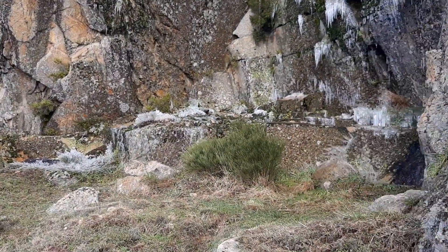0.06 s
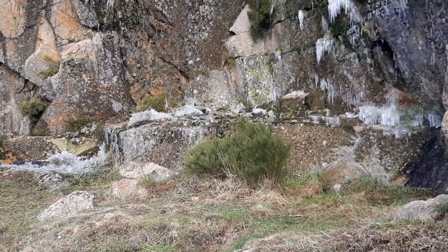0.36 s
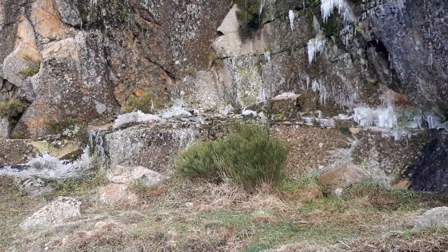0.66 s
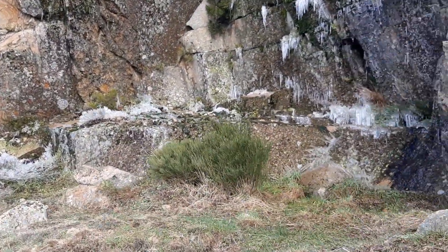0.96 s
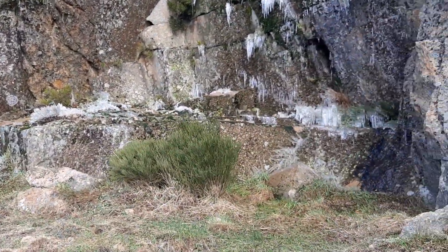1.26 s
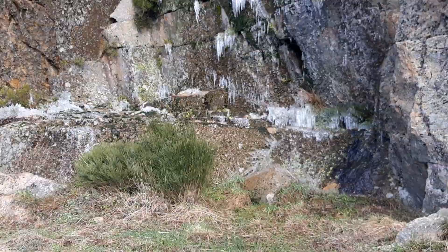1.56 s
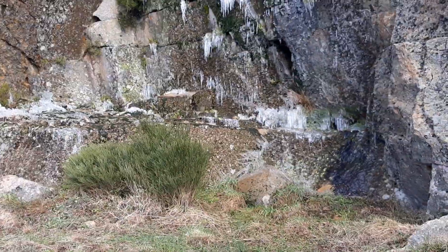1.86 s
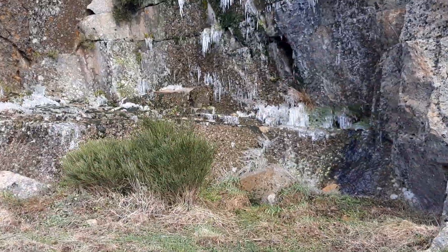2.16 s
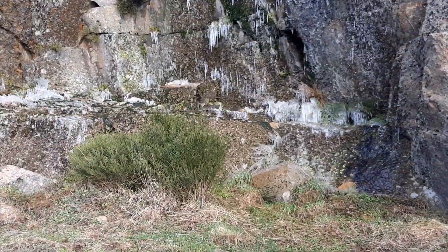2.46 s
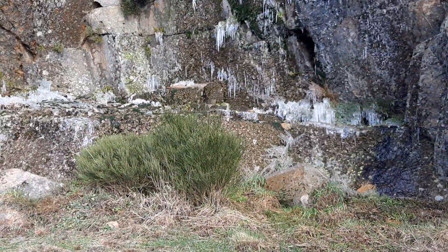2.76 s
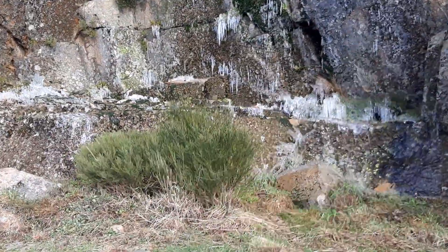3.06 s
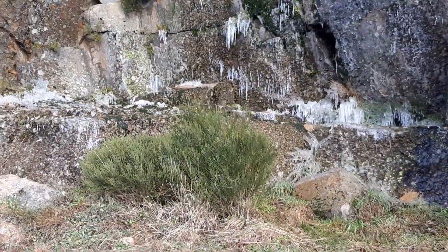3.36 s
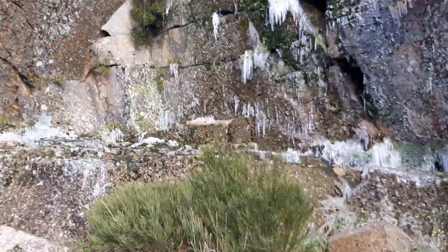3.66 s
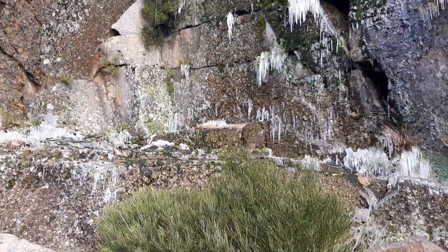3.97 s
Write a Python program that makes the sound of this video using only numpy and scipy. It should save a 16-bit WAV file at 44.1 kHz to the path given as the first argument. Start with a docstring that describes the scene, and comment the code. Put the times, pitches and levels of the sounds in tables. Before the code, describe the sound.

Soft wind gusts rumble on the microphone, with small water drips and dry grass crackling underfoot.

```python
"""Slow steps over dry grass below a thawing, icy cliff, with distant air hissing throughout.
At first gusts buffet the two microphone ports while meltwater spatters on the rock and stalks snap.
From about 0.7 s the grass crackles under the tread and a sole scuffs the turf; it rocks a loose stone
at 1.3 s and 2.3 s, as the wind eases. The sharpest scuff comes at 3.5 s, then the gusts return and
the patter of far drips swells at the very end."""
import sys
import numpy as np
from scipy import signal
from scipy.fft import rfft, irfft
from scipy.io import wavfile
from scipy.ndimage import uniform_filter1d

SR = 44100
rng = np.random.default_rng(int(sys.argv[2]) if len(sys.argv) > 2 else 0)


def unload_wav(signal):
    """Save mono or channel-first audio to the path in sys.argv[1] as 16-bit WAV at rate SR, clipped to [-1, 1]."""
    wavfile.write(
        sys.argv[1],
        SR,
        np.round(np.clip(np.atleast_2d(signal).T, -1, 1) * 32767).astype(np.int16),
    )


N = 176400
TIME = np.arange(N) / SR


# weight of the tread on the grass: (time [s], relative level [dB])
TREAD_CURVE = [(0.0, -72), (0.68, -64), (0.87, -70), (1.18, -55), (1.3, -66.5), (1.65, -76), (2.06, -58),
               (2.25, -70.5), (2.4, -58.5), (2.7, -82), (2.88, -65), (3.3, -61.5), (3.44, -67),
               (3.56, -54.5), (4.0, -65)]
# tone of the dry blades: (frequency [Hz], relative level [dB])
GRASS_EQ = [(300, -37), (800, -7), (1600, -1), (2800, -2), (4400, 1), (7000, -8), (15000, -6.5)]

def grass():
    """Crushed blades give a dense crackle that rides the weight of the tread."""
    tread_db = automation(TREAD_CURVE)
    clicks = grains(per_s=600, spread_db=3)
    crackle = np.sqrt(signal.lfilter([1], [1, -.93], clicks ** 2 + 1e-18)) * white()
    return coloured(crackle, GRASS_EQ) * from_db(-63.5 + 1.14 * tread_db)


# breaking stalks: (time [s], level [dB], pitch [Hz], decay [s], ping against the crack [dB])
STALK_SNAPS = [(0.3279, -33, 5240, 0.0007, -3.5), (0.52, -39, 4800, 0.0013, -7),
               (0.535, -37.5, 4930, 0.0018, -12), (.653, -44.5, 4080, 0.016, -4),
               (1.137, -38, 5070, 0.003, -10), (1.149, -41, 5640, 0.002, -6),
               (1.2638, -49.5, 4740, 0.0014, 9.5), (1.69, -50, 5500, .004, -6),
               (2.0299, -30, 3960, 0.00075, -10), (2.032, -39, 4800, 0.0018, -10),
               (2.105, -43.5, 3550, 0.004, -16), (2.441, -39, 6150, 0.0059, -14),
               (2.907, -44.5, 4900, 0.0087, -14), (2.957, -45.5, 4700, 0.0045, -1),
               (3.253, -39.5, 3530, .005, -6), (3.275, -44, 4860, 0.016, -12),
               (3.507, -32, 2800, 0.0052, -10), (3.603, -38, 4600, 0.0076, -15)]

def snaps():
    """A dry stalk breaks with a splintery crack and a brief clean ping at its own pitch."""
    out, fibres = 0, white()
    for s, db, hz, decay, ping_db in STALK_SNAPS:
        splinter = evened(resonance(fibres, hz, q=2), samples=130)
        crack = burst(s, decay) * (splinter + from_db(-28) * fibres)
        ping = from_db(ping_db) * burst(s, decay=.0015) * sine(hz, s)
        out = out + from_db(db) * (crack + ping)
    return cut(out, 1800, "high") * panned(-3.5)


# sole on turf: (time [s], level [dB], attack [s], decay [s], low-pass [Hz], resonance [Hz])
SOLE_SCUFFS = [(0.863, -52, 0.0046, 0.021, 1440, 1290), (1.19, -50, 0.016, 0.041, 1900, 1660),
               (1.811, -51.5, 0.019, 0.022, 1330, 490), (2.03, -56, 0.19, 0.16, 2140, 1430),
               (2.312, -50.5, 0.0066, 0.054, 2080, 1520), (2.892, -56.5, 0.048, 0.077, 1390, 1080),
               (3.26, -55, 0.11, 0.077, 2110, 1580), (3.506, -37.5, 0.015, 0.015, 7140, 2670),
               (3.53, -51, 0.057, 0.13, 2060, 1450)]
# tone of the grit: (frequency [Hz], relative level [dB])
GRIT_EQ = [(150, 10.5), (450, 7), (900, 3), (1800, 3), (4000, 8), (12000, 15.5)]
# stereo image of the grit: (frequency [Hz], left-right correlation [-1..1])
GRIT_IMAGE = [(600, 1), (3000, 0.088)]

def scuffs():
    """The sole rubs the turf: mostly dull, gritty friction, each scuff with its own resonance."""
    out, grit = 0, wide_noise(GRIT_EQ, GRIT_IMAGE) * from_db(2 * wander(hz=157))
    for s, db, attack, decay, top_hz, ring_hz in SOLE_SCUFFS:
        rub = grit + 1.4 * resonance(grit, ring_hz, q=7.9)
        out = out + from_db(db) * burst(s, decay, attack) * rms_one(cut(rub, top_hz, order=3))
    return out


# a loose stone rocks under the sole: (time [s], level [dB], low-pass [Hz])
STONE_KNOCKS = [(1.319, -35, 600), (2.3028, -36.5, 1400), (2.314, -38.5, 3000)]
# modes of the stone: (frequency [Hz], relative level [dB])
STONE_MODES = [(280, -4.5), (520, -5.5), (1350, -11.5), (1850, -6), (2200, -5)]

def knocks():
    """A stone bedded in turf rings for a few milliseconds; the first knock is dull, the rest brighter."""
    out = 0
    for s, db, top_hz in STONE_KNOCKS:
        ring = sum(from_db(mode_db) * sine(hz, s) for hz, mode_db in STONE_MODES)
        out = out + from_db(db) * cut(ring * burst(s, decay=.0033), top_hz)
    return out


# close drops on rock: (time [s], relative tick level [dB], relative spray level [dB])
NEAR_DRIPS = [(.132, -35, -45), (0.164, -50, -39.5), (0.519, -27, -35.5), (0.5998, -31, -44),
              (.618, -27.5, -44), (0.655, -28, -40), (1.0483, -19.5, -54), (1.1504, -28, -44),
              (1.323, -33, -62), (1.4318, -28, -54), (1.8302, -31, -58), (1.8551, -23, -40),
              (1.8694, -32, -43), (2.0299, -33, -51), (2.202, -36, -41), (2.7594, -37, -43),
              (3.103, -33, -33), (3.13, -41, -51), (3.161, -43, -34.5), (3.3585, -30, -35.5),
              (3.4897, -26, -38), (3.563, -20, -39), (3.867, -26.5, -52)]
# tone of splashing water: (frequency [Hz], relative level [dB])
SPLASH_EQ = [(1500, 12), (3000, -5), (5000, 3.5), (8000, 7), (12000, 6), (16000, 1.5)]

def drips():
    """Close drops hit the rock with a bright, ringing tick and a grainy spray, over the far patter."""
    near_gain = from_db(-7.5)
    impacts = near_gain * sum(from_db(db) * burst(s, decay=.00036) for s, db, _ in NEAR_DRIPS)
    sprays = near_gain * sum(from_db(db) * burst(s, decay=.013) for s, _, db in NEAR_DRIPS)
    tick = impacts * evened(coloured(white(), SPLASH_EQ), samples=24)
    ring = from_db(-5) * resonance(tick, 12000, q=5.1)
    wash_envelope = np.hypot(sprays, far_patter())
    wash = coloured(white(), SPLASH_EQ) * wash_envelope
    graininess = rms_one(from_db(3.5 * wander(hz=390)))
    return tick + ring + wash * graininess


# fader ride on the far drips and droplets: (time [s], relative level [dB])
PATTER_CURVE = [(0.0, -60), (0.61, -57.5), (1.2, -59.5), (1.4, -60), (2.95, -56), (3.62, -52.5),
                (3.91, -56.5), (4.0, -41.5)]

def far_patter():
    """Envelope of many farther drops landing at random, each with a short tail of spray."""
    decay_s = .017
    hits = grains(per_s=82, spread_db=3)
    power = signal.lfilter([1], [1, -np.exp(-2 / (decay_s * SR))], hits ** 2 + 1e-18)
    envelope = np.sqrt(np.abs(uniform_filter1d(power, SR // 800)))
    return rms_one(envelope) * from_db(-56.5 + automation(PATTER_CURVE))


def droplets():
    """Scattered water lands in tiny sharp ticks that rise and fall with the patter."""
    hits = signal.lfilter([1], [1, -.98], grains(per_s=120, spread_db=1) + 1e-18)
    return coloured(hits * white(), SPLASH_EQ) * from_db(-61.5 + automation(PATTER_CURVE))


# gusts and eddies: (time [s], level [dB], half length [s], low-pass [Hz], left over right [dB])
GUSTS = [(0.031, -27, 0.041, 206, 3), (0.131, -30.5, 0.048, 255, -12), (0.284, -30.5, 0.082, 185, 3.5),
         (0.439, -25, 0.024, 212, -10), (0.513, -14, 0.01, 204, 23), (0.547, -28, 0.038, 190, 0.5),
         (0.576, -20, 0.0067, 185, -24), (0.799, -30.5, 0.12, 142, 0), (1.05, -27, 0.021, 276, -12),
         (1.157, -31.5, 0.043, 169, 3.5), (1.367, -46, 0.028, 125, -1), (1.485, -39.5, 0.018, 134, -7),
         (1.716, -48, 0.021, 105, 22), (1.924, -34.5, 0.03, 246, -33), (2.063, -36, 0.055, 143, -2.5),
         (2.184, -30.5, 0.027, 230, -37), (2.353, -41.5, 0.023, 109.3, -21), (2.626, -44, 0.024, 100, 2),
         (2.867, -42, 0.028, 230, 1), (3.0, -42, 0.037, 105, -12), (3.221, -25.5, 0.006, 195, 34),
         (3.25, -37.5, 0.077, 132, -6), (3.55, -35, 0.038, 146, -3), (3.708, -29.5, 0.054, 228, -9),
         (3.78, -32, 0.17, 158, -8.5)]
# tone of the buffeting: (frequency [Hz], relative level [dB])
RUMBLE_EQ = [(22, -64), (37, -6), (55, 4), (84, 3.5), (120, 0.5), (200, -3), (400, -12), (1000, -12.5)]
# tone of the wind's hiss: (frequency [Hz], relative level [dB])
HISS_EQ = [(300, 2), (600, 6), (1200, -1), (2700, -24), (8000, -13)]

def wind():
    """Gusts rumble separately at the two ports over a low breeze; a faint hiss swells with the flow."""
    swirl = evened(coloured(white(), RUMBLE_EQ), samples=1800)
    swirl = rms_one(swirl * from_db(2.5 * wander(hz=52)))
    breeze_gain = from_db(-54)
    rumble = breeze_gain * rms_one(cut(swirl, 117, order=3))
    flow = breeze_gain ** 2
    for s, db, half_length, top_hz, pan_db in GUSTS:
        swell = from_db(db) / (1 + .25 * ((TIME - s) / half_length) ** 2) ** 3
        push = rms_one(cut(swirl, top_hz, order=3))
        skew = .12 * cut(push ** 2, 144, "high")  # pressure at a port swings harder one way
        rumble = rumble + swell * panned(pan_db) * (push + slap(s, half_length, top_hz) - skew)
        flow = flow + swell ** 2
    hiss = rms_one(coloured(white(), HISS_EQ) * uniform_filter1d(flow, SR // 4) ** .25)
    return from_db(-.5) * rumble + from_db(-61) * hiss


def slap(s, half_length, top_hz):
    """An eddy slaps the port with one swing of pressure, hardest for the briefest eddies."""
    width_s = .2 / top_hz
    strength = from_db(-3.5) * np.exp(-half_length / .037)
    u = np.minimum(((TIME - s) / width_s) ** 2, 50)
    return strength * (u - 1) * np.exp(-u / 2)


def cliff(x):
    """The rock face scatters close sounds back as a very short reverb."""
    t, decay_s = TIME[:SR // 3], .012
    scatter = rng.standard_normal((2, len(t))) * np.exp(-t / decay_s)
    return signal.fftconvolve(x, rms_one(scatter) / np.sqrt(len(t)), axes=1)[:, :N]


# tone of the distant air: (frequency [Hz], relative level [dB])
AIR_EQ = [(100, 13.5), (300, 7), (1100, 4.5), (1550, 3.5), (2100, -2), (2900, -16), (8000, -15.5),
          (15000, -22)]
# stereo image of the air: (frequency [Hz], left-right correlation [-1..1])
AIR_IMAGE = [(100, 0.44), (400, 0.92), (950, -0.62), (2000, 0.09)]

def distant_air():
    """Far-off air lays a soft, steady bed of hiss behind everything."""
    return from_db(-56.5) * cut(wide_noise(AIR_EQ, AIR_IMAGE), 78, "high")


def from_db(db):
    """Decibels to gain."""
    return 10 ** (np.asarray(db) / 20)


def rms_one(x):
    """Scale to unit rms."""
    return x / np.sqrt(np.mean(x ** 2) + 1e-20)


def evened(x, samples):
    """Level a sound by its running rms."""
    return x / np.sqrt(np.abs(uniform_filter1d(x ** 2, samples)) + 1e-12)


def automation(curve):
    """A level curve at every sample, in dB about its mean."""
    db = np.interp(TIME, *np.transpose(curve))
    return db - db.mean()


def at_hz(points):
    """A table over log frequency, read at every FFT bin."""
    hz, value = np.transpose(points)
    return np.interp(np.log(np.fft.rfftfreq(N, 1 / SR) + 1), np.log(hz), value)


def panned(db):
    """Constant-power pan; positive is left."""
    gains = from_db(np.array([[.5], [-.5]]) * db)
    return gains / np.sqrt(np.mean(gains ** 2, axis=0))


def cut(x, hz, kind="low", order=2):
    """Butterworth low- or high-pass."""
    return signal.sosfilt(signal.butter(order, hz, kind, fs=SR, output="sos"), x)


def resonance(x, hz, q):
    """Resonant band-pass."""
    return signal.lfilter(*signal.iirpeak(hz, q, fs=SR), x)


def sine(hz, s):
    """A pure tone with a random phase at time s."""
    return np.sin(2 * np.pi * (hz * (TIME - s) + rng.random()))


def white():
    """Independent noise in each channel."""
    return rng.standard_normal((2, N))


def wander(hz):
    """Random modulation, low-passed at hz; rms 1."""
    return rms_one(cut(rng.standard_normal(N), hz))


def coloured(x, eq):
    """Apply an EQ curve; rms 1."""
    return rms_one(irfft(rfft(x) * from_db(at_hz(eq)), N))


def wide_noise(eq, image):
    """Coloured noise whose stereo width varies with frequency."""
    mid, side = rfft(white())
    alike = np.clip(at_hz(image), -1, 1)
    spectrum = np.sqrt(1 + alike) * mid + np.sqrt(1 - alike) * side * [[1], [-1]]
    return coloured(irfft(spectrum, N), eq)


def burst(s, decay, attack=.0001):
    """Envelope with a rounded rise to its peak at s and an exponential fall; times in seconds."""
    t = TIME - s
    return np.exp(-np.minimum(np.where(t < 0, (t / attack) ** 2, t / decay), 20))


def grains(per_s, spread_db):
    """Random clicks, many small and a few large."""
    return (rng.random(N) < per_s / SR) * from_db(spread_db * np.minimum(rng.exponential(1, N), 4))


def scene():
    """Steps and meltwater before the cliff, with the air behind and the wind on the ports."""
    water = cut(drips() + droplets(), 2430, "high") * panned(-1.5)
    near = water + snaps() + grass() + scuffs() + knocks()
    return near + from_db(-3.5) * cliff(near) + distant_air() + wind()


def record(dry):
    """The microphone has a dip in the treble; the lowest bass and the top are cut."""
    notched = signal.lfilter(*signal.iirnotch(8860, Q=2.34, fs=SR), dry)
    dipped = dry + .65 * (notched - dry)
    top_cut = signal.ellip(10, .2, 80, 16000, fs=SR, output="sos")
    return signal.sosfilt(top_cut, cut(dipped, 26.4, "high", order=3))


dry = scene()
out = record(dry)
unload_wav(out)
```